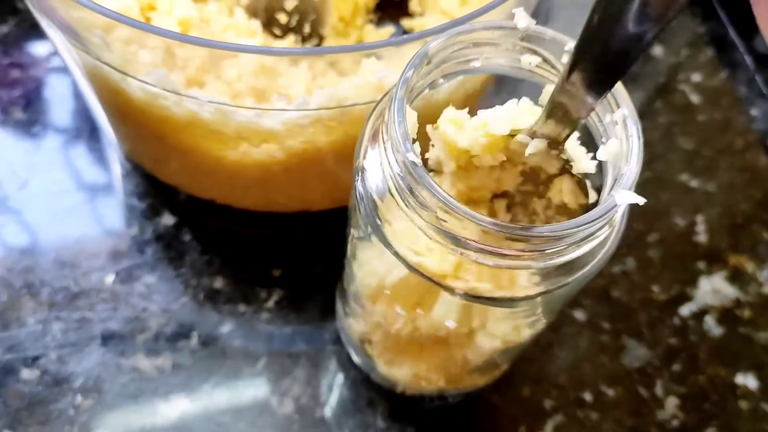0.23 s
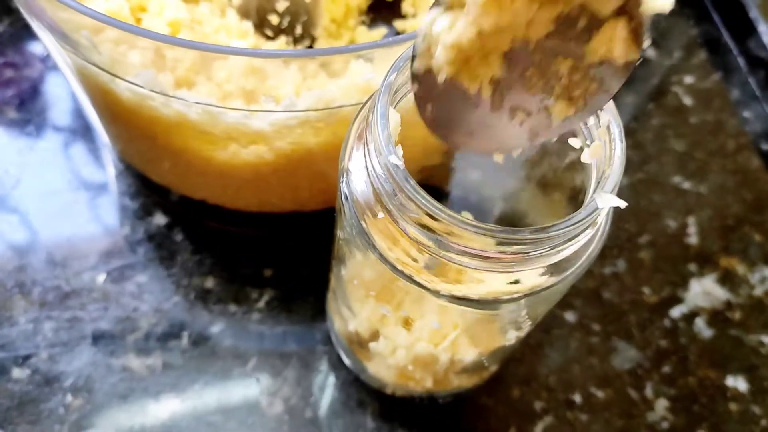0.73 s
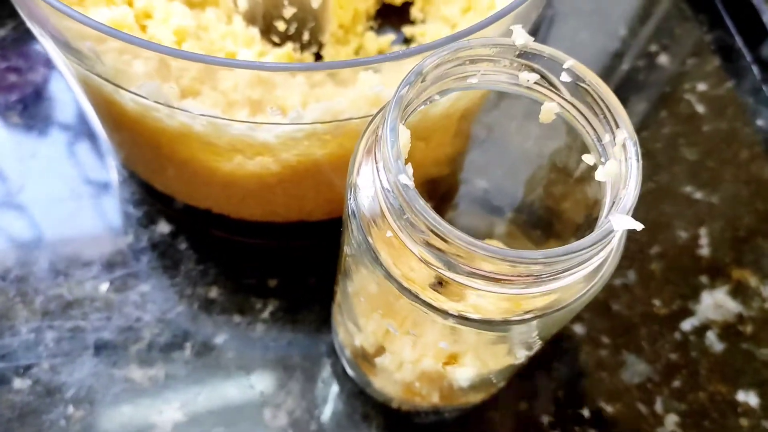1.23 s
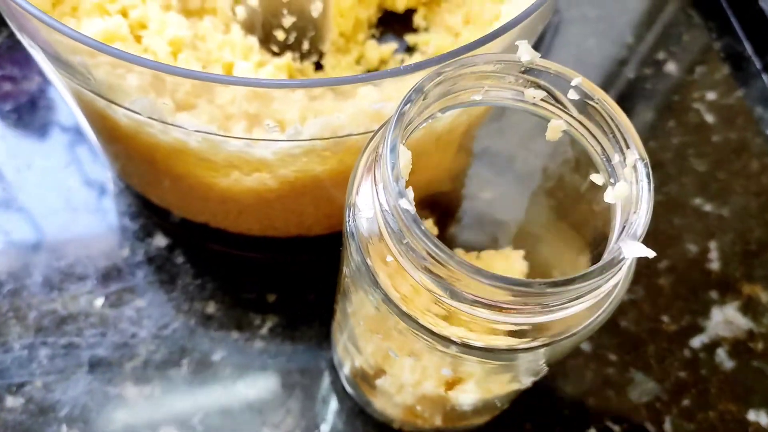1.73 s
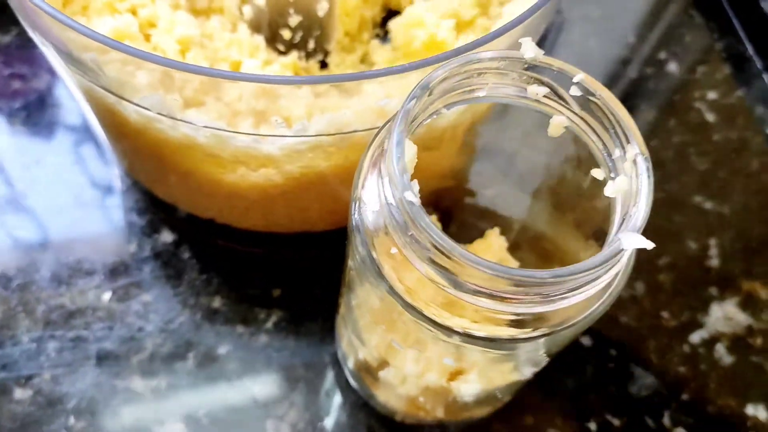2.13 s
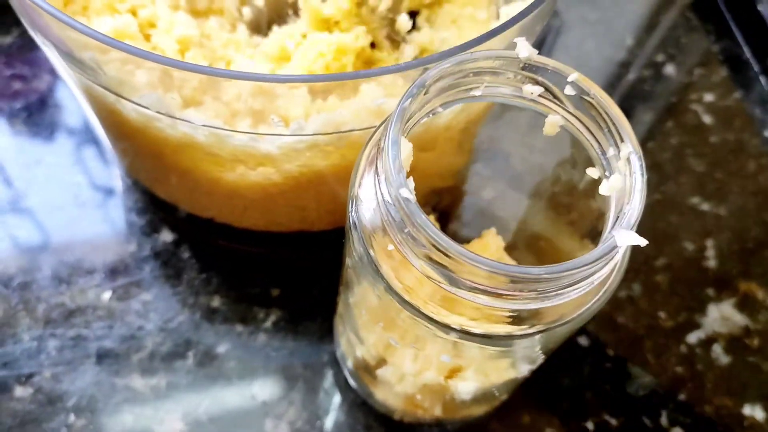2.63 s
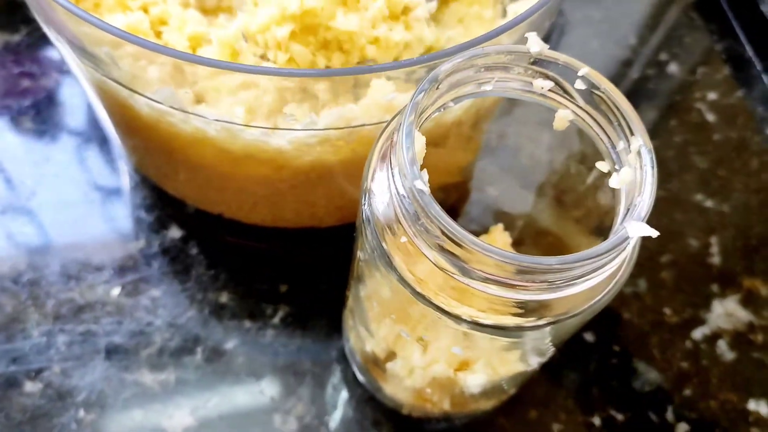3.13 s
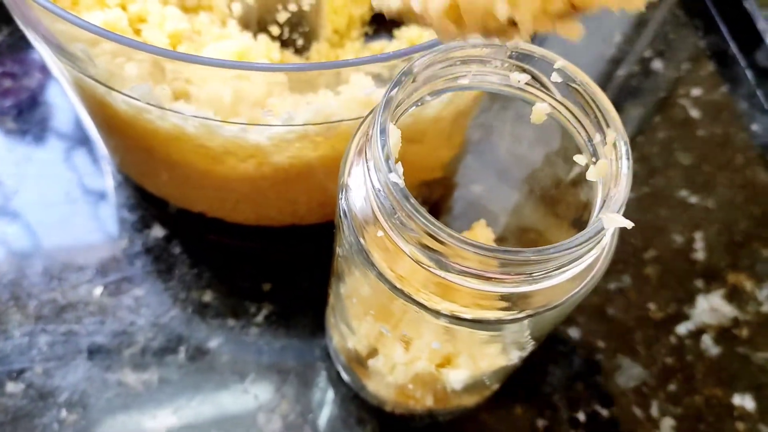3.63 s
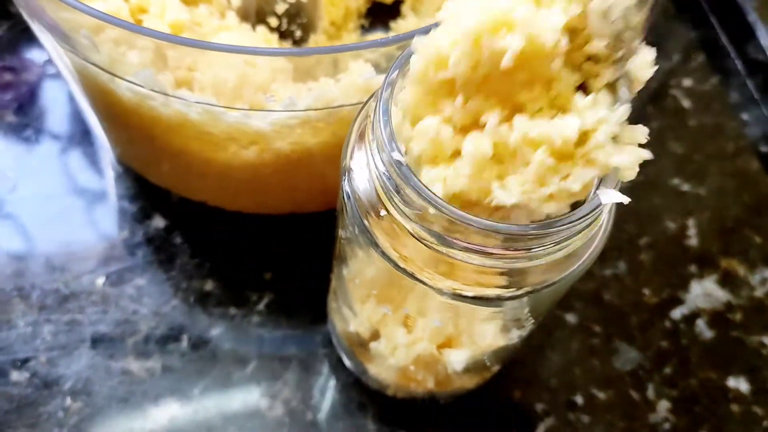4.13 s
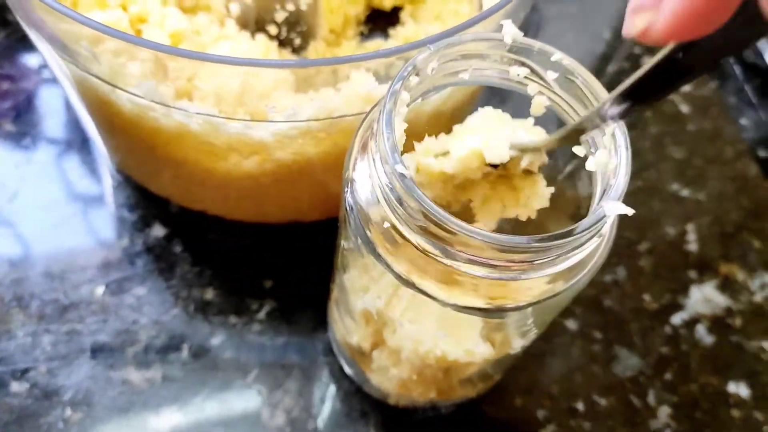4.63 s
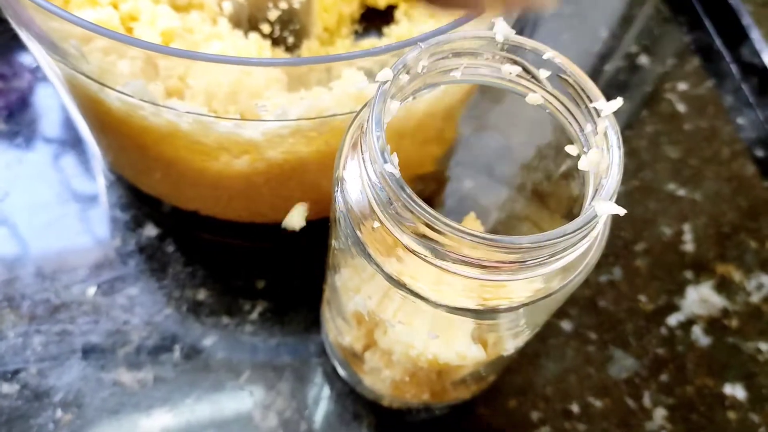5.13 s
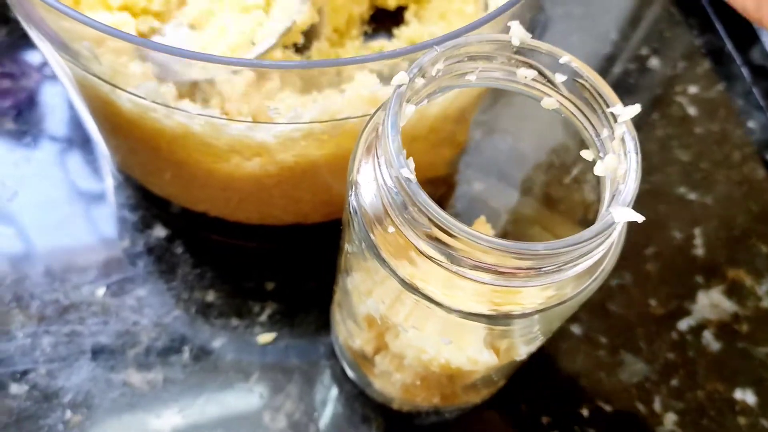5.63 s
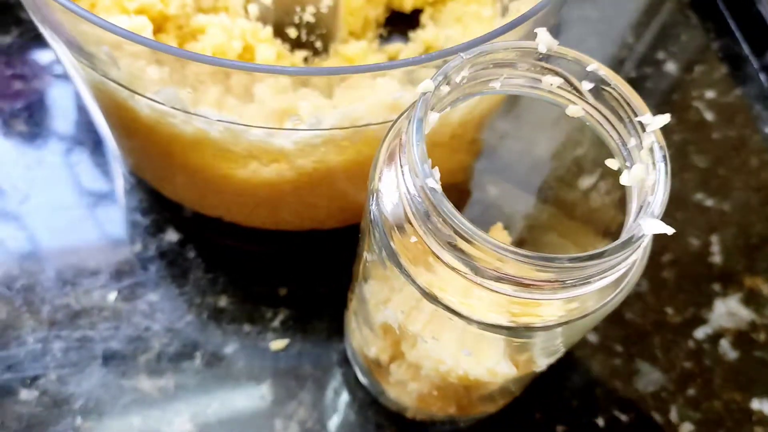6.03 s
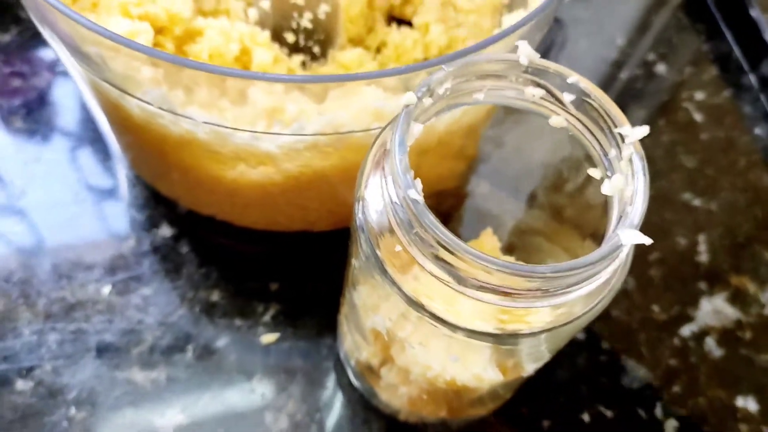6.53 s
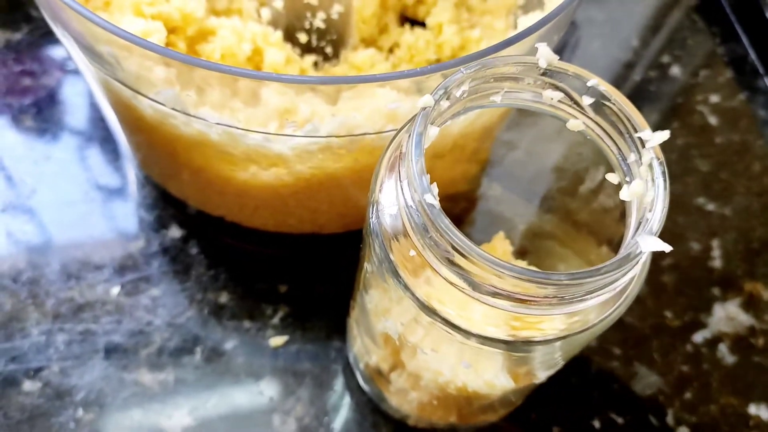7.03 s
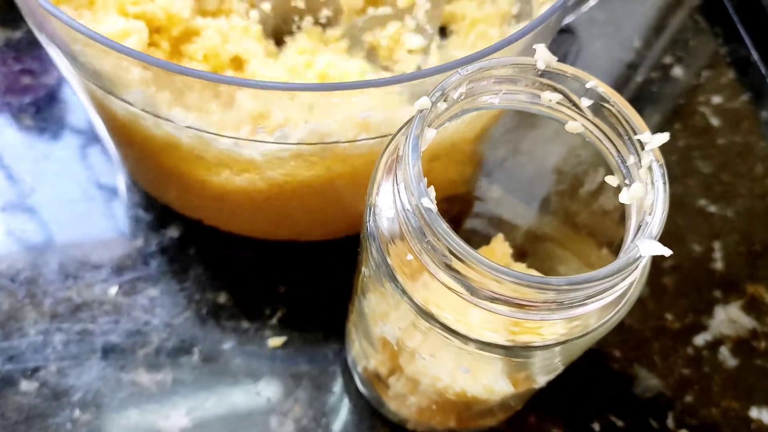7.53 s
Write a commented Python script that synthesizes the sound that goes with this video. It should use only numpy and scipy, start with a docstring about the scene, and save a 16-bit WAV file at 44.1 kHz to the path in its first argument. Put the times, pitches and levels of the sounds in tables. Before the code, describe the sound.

A close stereo pickup in a small, hard kitchen, with faint low rumble throughout. A barely audible spoon scrape opens; at 0.55 s steel clinks moderately on the glass jar with a short high ring, and a crumb drops dully near 0.8. Faint crumbly scraping runs from 1.8 to 2.3, with a light bowl knock at 2.25 and a weaker dull one at 2.6. Near quiet follows until two soft, dull touches at 4.15-4.2. At 4.75 a strong, bright glass clink rings out, then a lighter steel chink at 4.93 and a soft puff of air around 5.05. At 6.0 a faint scrape and squeak lead into three loud, heavy, damped bowl knocks at 6.22, 6.37 and 6.51, with chattering on stone, low boom and short echoes. Lesser knocks come at 7.17 and 7.33. Around 7.5 a short gritty scoop, rustle and tiny squeaks are heard, then echoes fade.

```python
"""A metal spoon moves a crumbly mixture from a large glass bowl into a glass jar on a stone kitchen worktop.
It rustles and scrapes through the crumbs (grainy coloured noise), clinks on the neck of the jar (ringing
modes and short bursts), squeaks on the glass (gliding tones) and knocks hard on the bowl, which rattles on
the stone. A crumb drops dully. The small hard room rings on as decaying noise; a low rumble and a few puffs
of air lie underneath."""
import sys
import numpy as np
from scipy import signal
from scipy.fft import rfft, irfft, next_fast_len
from scipy.io import wavfile
from scipy.ndimage import uniform_filter1d

SR = 44100
rng = np.random.default_rng(int(sys.argv[2]) if len(sys.argv) > 2 else 0)


def waveform_to_disk(signal):
    """Save audio, clipped to [-1, 1], as 16-bit WAV at the path in sys.argv[1]."""
    frames = np.transpose(np.atleast_2d(signal))
    scaled = np.clip(frames, -1, 1) * 32767
    samples = np.round(scaled).astype(np.int16)
    wavfile.write(sys.argv[1], SR, samples)


N = 342657   # samples in the scene


def from_db(db):
    """Decibels to gain."""
    return 10 ** (np.asarray(db) / 20)


def rms_one(x):
    """Scale to unit rms."""
    return x / np.sqrt(np.mean(x ** 2) + 1e-20)


def at_hz(points, hz):
    """Read a table on a log-frequency axis."""
    table_hz, values = np.array(points).T
    return np.interp(np.log(hz + 1), np.log(table_hz), values)


def pan(db):
    """Left and right gains of equal total power; positive leans left."""
    return rms_one(from_db([[db / 2], [-db / 2]]))


def add(out, s, sound):
    """Mix a sound in at a time in seconds."""
    i = int(s * SR)
    out[:, i:i + sound.shape[1]] += sound[:, :N - i]


def noise(spectrum, likeness, size):
    """Stereo noise of a given colour and left-right likeness; rms 1."""
    n = next_fast_len(size)
    hz = np.arange(n // 2 + 1) * SR / n
    alike = np.clip(at_hz(likeness, hz), -1, 1)
    mid, side = np.exp(2j * np.pi * rng.random((2, len(hz))))
    both = np.sqrt(1 + alike) * mid + np.sqrt(1 - alike) * side * [[1], [-1]]
    coloured = both * from_db(at_hz(spectrum, hz)) * (hz > 0)
    return rms_one(irfft(coloured, n)[:, :size])


# how alike contacts and their echoes are on the two sides: [f/Hz, likeness]
HIT_LIKENESS = [(100, 0.85), (350, .9), (700, 0.091), (1500, 0), (4000, 0), (7000, 0.91), (14000, 0.098)]


def burst(spectrum, contact_s, t60):
    """Crowded resonances swell while the contact lasts, then die away."""
    t = np.arange(SR // 8) / SR
    rise = np.minimum(t / contact_s, 1)
    decay = 10 ** (-3 * np.maximum(t - contact_s, 0) / t60)
    return rise * decay * noise(spectrum, HIT_LIKENESS, size=len(t))


def ring(modes, contact_s, spread_db, length=1, detune=0):
    """Each blow excites the modes a little differently; higher ones reach the sides more out of step."""
    t, out = np.arange(SR) / SR, 0
    for hz, db, t60, side_db in modes:
        phase = 2 * np.pi * rng.random() + np.array([[.5], [-.5]]) * min(hz / 700, 1.3)
        swing = np.sin(2 * np.pi * hz * (1 + detune * rng.normal()) * t + phase)
        decay = np.exp(-np.log(1000) * t / (t60 * length))
        level = from_db(db + spread_db * rng.normal())
        out = out + level * pan(side_db) * decay * swing
    return out * np.minimum(t / contact_s, 1)


def swells(rows, attack_s, sag_db_per_s, release_s, axis):
    """Gain over time: each event rises, sags slowly while it lasts, then dies away."""
    out = 0
    for row in rows:
        t, length = np.arange(N) / SR - row[0], row[1]
        held = from_db(row[axis] - sag_db_per_s * np.clip(t, 0, length))
        rise = np.clip(t / attack_s, 0, 1)
        out = out + held * rise * np.exp(-np.maximum(t - length, 0) / release_s)
    return out


# colour of the background rumble and hiss: [f/Hz, relative level/dB]
FLOOR = [(12, -29), (20, 5.5), (49, -8.5), (87, -16.5), (169, -14), (199, -21.5), (286, -28), (347, -20.5),
         (470, -27), (555, -31.5), (914, -29.5), (1170, -35), (8620, -49.5), (13800, -45.5), (15000, -58)]
# how alike the background and the puffs of air are on the two sides: [f/Hz, likeness]
FLOOR_LIKENESS = [(30, 0.06), (120, 0.71), (400, 0.54), (1000, 0.15), (4000, 0.52), (7000, 0.59),
                  (14000, 0.52)]


def background():
    """Steady noise, strongest in the lowest bass."""
    return from_db(-52) * noise(FLOOR, FLOOR_LIKENESS, size=N)


# kitchen echoes, fading time per pitch: [f/Hz, t60/s]
ROOM_T60 = [(100, 1.38), (300, 0.49), (700, 0.7269), (2000, 0.62), (4000, 0.68), (8000, 0.5), (14000, 0.3)]
# kitchen echoes, starting colour: [f/Hz, relative level/dB]
ROOM_COLOUR = [(60, 1), (150, 0), (400, -1.5), (1000, -0.5), (2500, 2), (5000, -3), (9000, 1), (14000, 0)]


def kitchen(x, wet_db, build_s):
    """Diffuse reflections build up quickly; each octave then dies at its own rate."""
    t = np.arange(SR) / SR
    hz = np.arange(SR // 2 + 1)
    echoes = rfft(noise(ROOM_COLOUR, HIT_LIKENESS, size=SR))[:, :len(hz)]
    centres = np.geomspace(60, 15360, 9)   # one per octave
    tail = 0
    for centre, share in zip(centres, np.eye(len(centres))):
        band = irfft(echoes * at_hz(np.c_[centres, share], hz), SR)
        tail = tail + band * np.exp(-np.log(1000) * t / at_hz(ROOM_T60, centre))
    build_up = 1 - np.exp(-(t / build_s) ** 2)
    tail = rms_one(tail * build_up) / np.sqrt(SR)
    feed = 0.59 * x + .25 * x[::-1]      # each wall hears both sides
    return from_db(wet_db) * signal.fftconvolve(feed, tail, axes=1)[:, :N]


def grains(per_s, t60, spread_db):
    """Envelope of many tiny slips of uneven size; rms 1."""
    sizes = from_db(spread_db * np.clip(rng.standard_normal(N), -2, 2))
    slips = (rng.random(N) < per_s / SR) * sizes
    keep = np.exp(-2 * np.log(1000) / (t60 * SR))   # share of power left after one sample
    power = signal.lfilter([1], [1, -keep], slips ** 2 + 1e-18)
    return rms_one(np.sqrt(power))


# spoon strokes through the mixture:
# [t/s, length/s, scrape level/dB, crumb rustle level/dB, singing steel level/dB]
STROKES = [(.005, .11, -67, -73.5, -73.5), (1.78, 0.2, -66.5, -68.5, -73.5),
           (1.935, 0.043, -65, -67.5, -61.5), (2.02, 0.29, -59.5, -69, -65.5), (6.008, 0.11, -51, -72, -78),
           (7.481, 0.042, -38, -54.5, -54), (7.54, 0.1, -58, -57.5, -50.5)]
# the spoon bites, eases off and lifts
STROKE_ATTACK_S, STROKE_SAG_DB_PER_S, STROKE_RELEASE_S = .006, 19.5, 0.012
# colour of the scraping edge: [f/Hz, relative level/dB]
SCRAPE = [(200, -4.5), (550, -2.5), (820, 1.5), (950, -5.5), (1300, 0.5), (1800, -4), (2800, -8.5),
          (4200, -14.5), (5000, -19), (8000, -40.5)]
# colour of the breaking crumbs: [f/Hz, relative level/dB]
RUSTLE = [(2500, -23.5), (4500, -2.5), (7500, -2), (9200, -9.5), (12800, -0.5), (15000, -12)]
# the rubbed spoon sings around its main mode: [f/Hz, relative level/dB]
SPOON_SING = [(2500, -33), (3300, -18.5), (3650, -8.5), (4000, -17.5), (5000, -33.5)]


def digging():
    """The spoon's edge slips along the glass and sets the steel singing while crumbs break around it."""
    shape = STROKE_ATTACK_S, STROKE_SAG_DB_PER_S, STROKE_RELEASE_S
    slips = grains(per_s=850, t60=0.025, spread_db=2.5)
    crumbs = grains(per_s=2800, t60=0.016, spread_db=1.0)
    scrape = swells(STROKES, *shape, axis=2) * slips * noise(SCRAPE, HIT_LIKENESS, size=N)
    rustle = swells(STROKES, *shape, axis=3) * crumbs * noise(RUSTLE, HIT_LIKENESS, size=N)
    sing = swells(STROKES, *shape, axis=4) * slips * noise(SPOON_SING, HIT_LIKENESS, size=N)
    return scrape + rustle + sing


JAR_MAIN_HZ = 3530   # brightness tilts the jar's sound above its main mode


def tilted(table, db_per_octave):
    """A harder contact lifts the rows above the jar's main mode; a softer one dulls them."""
    out = []
    for hz, db, *rest in table:
        octaves_above = max(np.log2(hz / JAR_MAIN_HZ), 0)
        out.append((hz, db + db_per_octave * octaves_above, *rest))
    return out


# spoon touches on the jar, and a crumb's dull fall (the second row): [t/s, jar ring level/dB,
# spoon ring level/dB, dull tap level/dB, jar brightness/dB per octave, ring length/share of the usual]
CLINKS = [(0.5474, -23.5, -27.5, -35.5, -8, 0.97), (.787, -80, -70, -51, -3, 0.46),
          (0.968, -76.5, -59.5, -63, 7, 0.27), (4.1522, -43.5, -33, -34.5, -7, .55),
          (4.1915, -36, -31.5, -34, -1, 0.34), (4.515, -65, -73, -72, 0, 0.56),
          (4.7443, -14, -45, -31, -0.1, 0.82), (4.931, -44.5, -26, -35.5, 3, 0.52),
          (5.046, -70, -45, -56, 0, 0.24), (5.781, -75, -65, -53, 0, .4), (7.543, -53.5, -39, -63, -3, .4)]
# ringing modes of the jar: [f/Hz, relative level/dB, usual t60/s, left-right/dB]
JAR = [(587, -21, 0.19, -5.5), (3170, -22, .06, -3), (3521, 4, 0.13, -16), (3600, -23.5, 0.35, -2.5),
       (5570, -13, 0.14, -9.5), (5510, -23, 0.26, -1.5), (5730, -22.5, 0.097, -0.5),
       (6934, -25.5, 0.03, -3), (8300, -36, 0.12, -12.5), (9380, -23.5, 0.13, -8), (10160, -26.5, 0.13, -3),
       (11230, -32.5, .06, -5), (11800, -23.5, 0.083, -5.5), (13400, -23, .18, 0.5),
       (14130, -36.5, .18, -10.5)]
# ringing modes of the spoon: [f/Hz, relative level/dB, usual t60/s, left-right/dB]
SPOON = [(1094, -9.5, 0.014, 8), (1238, -13.5, .16, -1), (3560, -14, 0.61, 0.5), (3586, -4, .16, -4.5),
         (5744, -26, 0.3, -0.5), (5970, -3.5, 0.1, -0.5), (8510, -35.5, .25, 1.5), (9980, -26, 0.11, 7),
         (10050, -26.5, 0.11, 2), (12640, -15.5, .16, 3.5), (13030, -33, .25, -0.5)]
# dull, quickly damped tap: [f/Hz, relative level/dB]
TAP = [(100, -22.5), (350, -5.5), (580, -1.5), (800, -2), (1150, 2.5), (1450, -11), (1850, -6.5),
       (2600, -18), (3300, -6), (4500, -19.5), (8000, -36.5)]
# damped clusters of spoon and jar modes around the ringing ones: [f/Hz, relative level/dB]
CHINK = [(2000, -10.5), (3000, -10), (3550, 8.5), (4400, -23.5), (5150, -4), (5750, 5), (6500, -11.5),
         (7100, -6), (7700, -17), (9700, -6), (11000, -13.5), (12900, -3), (15000, -14.5)]
CHINK_DB = -8   # relative to the ring of jar and spoon together
TOUCH_DAMPING_DB, TOUCH_S = -7.5, .018   # each contact takes energy from what still rings


def jar_clinks():
    """Steel meets the neck of the jar, or a crumb drops: chink, dull tap and rings the next contact damps."""
    strikes, rings = np.zeros((2, 2, N))
    t = np.arange(N) / SR
    for s, jar_db, spoon_db, tap_db, brightness_db, length in CLINKS:
        jar, spoon = from_db(jar_db), from_db(spoon_db)
        rings = rings * np.interp(t, [s, s + TOUCH_S], [1, from_db(TOUCH_DAMPING_DB)])
        jar_modes = tilted(JAR, brightness_db)
        add(rings, s, jar * ring(jar_modes, contact_s=0.0014, spread_db=0.9, length=length))
        add(rings, s, spoon * ring(SPOON, contact_s=.001, spread_db=0.5, length=length))
        add(strikes, s, from_db(tap_db) * burst(TAP, contact_s=0.002, t60=0.071))
        chink = burst(tilted(CHINK, brightness_db), contact_s=.001, t60=0.04)
        add(strikes, s, from_db(CHINK_DB) * np.hypot(jar, spoon) * chink)
    return strikes + rings + kitchen(strikes + from_db(-5.5) * rings, wet_db=-6.5, build_s=0.006)


# knocks on the bowl: [t/s, contact time/s, weight of the blow level/dB, hard edge level/dB, tick level/dB,
# base thump level/dB, worktop boom level/dB, time until the rocking bowl lands/s (0 = it stays put)]
KNOCKS = [(1.635, 0.001, -71.5, -48.5, -62, -80, -65.5, 0.00017),
          (1.949, 0.0074, -55.5, -70, -59, -46, -51.5, 0), (2.2435, 0.0024, -31, -25, -34, -30, -38, 0.022),
          (2.607, .0021, -42, -47, -70, -28.5, -51.5, 0),
          (6.224, 0.0059, -6.5, -6.5, -18, -7.5, -21, 0.032),
          (6.373, .004, -6, -7.5, -19.5, -13.5, -20, 0.000039),
          (6.5095, 0.0024, -10, -16, -27, -13.5, -25.5, 0),
          (7.1671, 0.0011, -16.5, -13.5, -32.5, -19.5, -33.5, 0),
          (7.3342, 0.0021, -40, -33.5, -44, -20.5, -45, 0)]
REBOUND_GAP_SHARE, REBOUND_LOSS_DB = .55, -7.5   # the second landing comes sooner; each is weaker
LANDING_WEIGHT_DB, LANDING_TICK_DB = -7.5, -16.5   # the foot lands lighter and duller than the spoon


def blows():
    """Every knock, and two landings of a bowl set rocking: (s, contact s, levels of the five parts in dB)."""
    lighter_db = np.array([LANDING_WEIGHT_DB, 0, LANDING_TICK_DB, LANDING_WEIGHT_DB, LANDING_WEIGHT_DB])
    for s, contact_s, *levels_db, rock_s in KNOCKS:
        yield s, contact_s, levels_db
        if rock_s > 0:
            delays = [rock_s, rock_s * (1 + REBOUND_GAP_SHARE)]
            for k, delay in enumerate(delays):
                yield s + delay, contact_s, lighter_db + levels_db + (k + 1) * REBOUND_LOSS_DB


# crowded, quickly damped thud of the blow: [f/Hz, relative level/dB]
THUD = [(60, -31), (130, -16.5), (200, -13), (310, -9.5), (410, -3), (500, -5), (660, 3.5), (850, -5),
        (1100, -6.5), (1500, -17), (3000, -50)]
# hard edge of the blow, also the rasp of the chattering bowl: [f/Hz, relative level/dB]
CLACK = [(300, -12), (700, -4), (1050, -10), (1400, -1), (1700, -8), (2000, -1), (2600, -11.5),
         (3700, -5.5), (4900, -22.5), (8000, -37)]
# bright tick of the contact: [f/Hz, relative level/dB]
TICK = [(1500, -22), (4000, -1), (6300, 0), (8500, -5), (11000, -4), (13500, -4.5), (16000, -18)]
# base of the bowl, damped by the mixture: [f/Hz, relative level/dB, t60/s, left-right/dB]
BASE = [(393.4, 2, 0.039, -1), (543, -5, 0.028, -7), (1564, -2.5, 0.02, 2)]
# modes of the bowl wall, before small random detuning: [f/Hz, relative level/dB, t60/s, left-right/dB]
BOWL = [(611.5, -1, 0.28, -18.5), (604, 4.5, 0.11, -18), (680, -21, 0.61, -8.5), (722, -8.5, 0.22, -12),
        (810, -13.5, 0.53, -7.5), (901, -7, 0.23, -3.5), (1014, -4.5, 0.15, 3.5), (1390, -11.5, 0.29, 3),
        (1570, -9.5, 0.15, -3), (1950, -14.5, .3, -1.5), (2024, -14.5, 0.52, -2), (2250, -23.5, 0.29, -3),
        (2622, -23, .25, -5), (3510, -17, 0.32, -10)]
# modes of the stone worktop: [f/Hz, relative level/dB, t60/s, left-right/dB]
WORKTOP = [(43.3, -19, 0.76, 2), (59.7, -18, 0.99, 0.14), (123.1, -2, 0.36, 0.22),
           (168, -11.5, 0.28, 0.083), (221, -4, 0.41, 0.36), (269.8, 0, 0.21, 0.21), (359, -0.5, 0.19, 0),
           (389.9, -7.5, 0.42, 0.19)]
WALL_DB = -13.5   # ring of the wall, relative to the weight of the blow
BOWL_SIDE_DB = -.5   # left-right lean of all the parts


def bowl_knocks():
    """The filled bowl is well damped: a thud, a clack and a short wall ring; the worktop booms under it."""
    strikes, rings = np.zeros((2, 2, N))
    for s, contact_s, (weight_db, edge_db, tick_db, base_db, boom_db) in blows():
        thud = from_db(weight_db) * burst(THUD, contact_s, t60=0.046) * pan(-4.5)
        clack = from_db(edge_db) * burst(CLACK, contact_s, t60=0.029)
        tick = from_db(tick_db) * burst(TICK, contact_s * 0.26, t60=0.041)
        base = from_db(base_db) * ring(BASE, contact_s, spread_db=1.5)
        wall = from_db(weight_db + WALL_DB) * ring(BOWL, contact_s, spread_db=3.0, detune=0.009)
        boom = from_db(boom_db) * ring(WORKTOP, contact_s=0.0034, spread_db=0.5)
        add(strikes, s, pan(BOWL_SIDE_DB) * (thud + clack + tick))
        add(rings, s, pan(BOWL_SIDE_DB) * (base + wall + boom))
    return strikes, rings


# puffs of moving air on the microphone: [t/s, length/s, level/dB]
PUFFS = [(5.04, 0.19, -37.5), (5.3, 0.037, -46), (7.49, .05, -40.5), (7.61, 0.14, -47)]
PUFF_ATTACK_S, PUFF_RELEASE_S = .025, 0.027
# colour of the air on the microphone: [f/Hz, relative level/dB]
GUST = [(12, -29), (20, -10), (43, 2.5), (124, -6.5), (316, -24.5), (409, -24.5), (492, -53), (600, -27),
        (780, -35), (1320, -120)]


def air_puffs():
    """Moving air buffets the microphone: short swells of low noise, mostly on the left."""
    puffs = swells(PUFFS, PUFF_ATTACK_S, 0, PUFF_RELEASE_S, axis=2)
    return puffs * pan(16.0) * noise(GUST, FLOOR_LIKENESS, size=N)


# steel squeaks on the glass: [t/s, length/s, starting f/Hz, final f/Hz, level/dB]
SQUEAKS = [(6.005, 0.14, 830.4, 798, -48), (7.508, 0.032, 1055, 1398, -40.5),
           (7.599, 0.019, 1320, 1205, -44), (7.636, 0.0454, 1078, 773, -51)]
SQUEAK_UNEVENNESS = 0.063   # rms share of the pitch


def squeaks():
    """Uneven stick and slip: a wavering tone glides in pitch; each squeak swells and fades."""
    out = np.zeros((2, N))
    for s, length, start_hz, end_hz, db in SQUEAKS:
        progress = np.minimum(np.arange(SR // 8) / SR / length, 1)
        unevenness = rms_one(uniform_filter1d(rng.standard_normal(len(progress)), size=40))
        glide = start_hz + (end_hz - start_hz) * progress
        pitch = glide * (1 + SQUEAK_UNEVENNESS * unevenness)
        tone = np.sin(2 * np.pi * np.cumsum(pitch) / SR)
        add(out, s, from_db(db) * pan(0) * np.sin(np.pi * progress) * tone)
    return out


# the bowl chatters on the stone after a hard blow: [t/s, length/s, f/Hz, level/dB]
CHATTER = [(6.243, 0.037, 608, -16), (6.513, 0.021, 653, -14.5)]


def bowl_chatter():
    """The bowl's foot bounces once a cycle of a low wall tone, rasping each time, then settles abruptly."""
    out, t = np.zeros((2, N)), np.arange(SR // 8) / SR
    for s, length, hz, db in CHATTER:
        held = np.minimum(t / 0.0054, 1) * np.exp(-np.maximum(t - length, 0) / 0.0079)
        swing = np.sin(2 * np.pi * hz * t + np.array([[.5], [-.5]]))
        rasp = np.maximum(swing, 0) ** 2 * noise(CLACK, HIT_LIKENESS, size=len(t))
        add(out, s, from_db(db) * held * (pan(-8) * swing + from_db(-8.5) * rasp))
    return out


def scene():
    """Jar, bowl and crumbs in the room, over the background and a little moving air."""
    strikes, rings = bowl_knocks()
    contacts = strikes + digging() + squeaks()
    tones = rings + bowl_chatter()
    echoes = kitchen(contacts + from_db(-10) * tones, wet_db=-6.0, build_s=0.0031)
    bowl = contacts + tones + echoes
    return jar_clinks() + bowl + air_puffs() + background()


CUTOFF_HZ = 14400


def record(dry):
    """The hardest knocks overload the input, which rounds their peaks; the top is cut steeply."""
    rounded = dry / (1 + dry ** 6) ** (1 / 6)
    low_pass = signal.ellip(10, .2, 70, CUTOFF_HZ, fs=SR, output="sos")
    return signal.sosfilt(low_pass, rounded)


dry = scene()
out = record(dry)
waveform_to_disk(out)
```